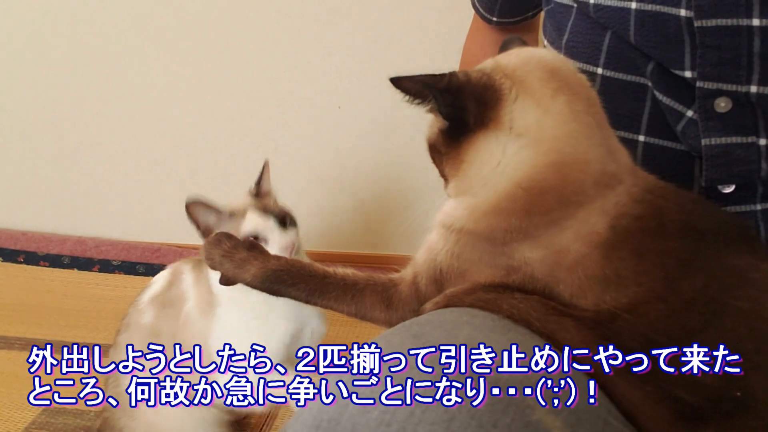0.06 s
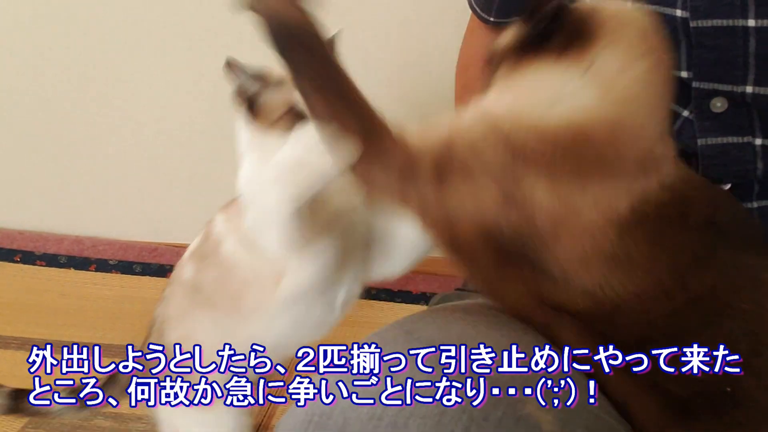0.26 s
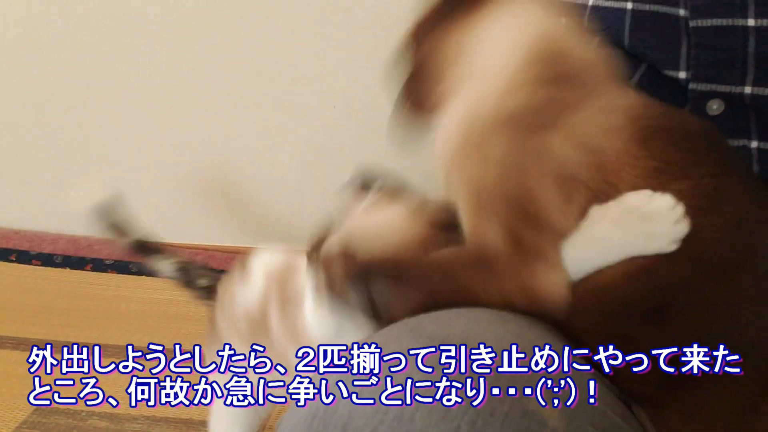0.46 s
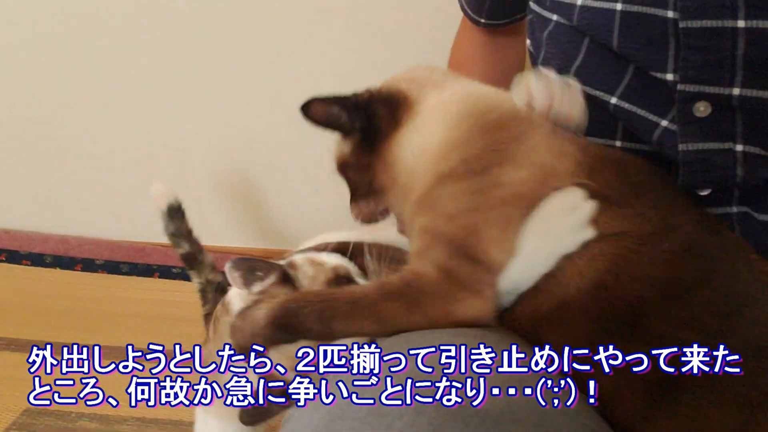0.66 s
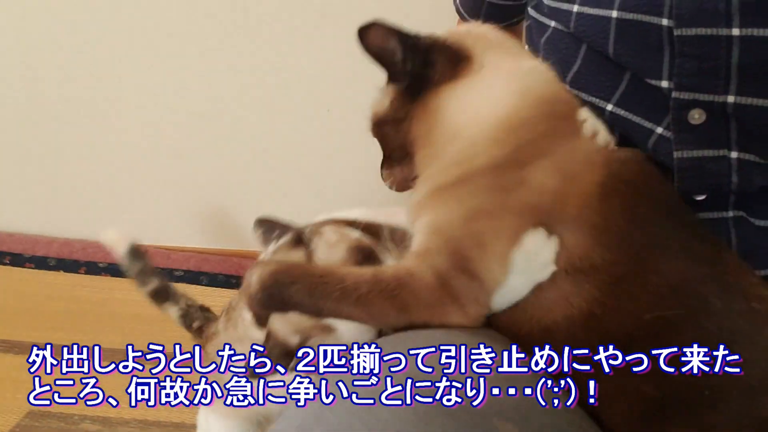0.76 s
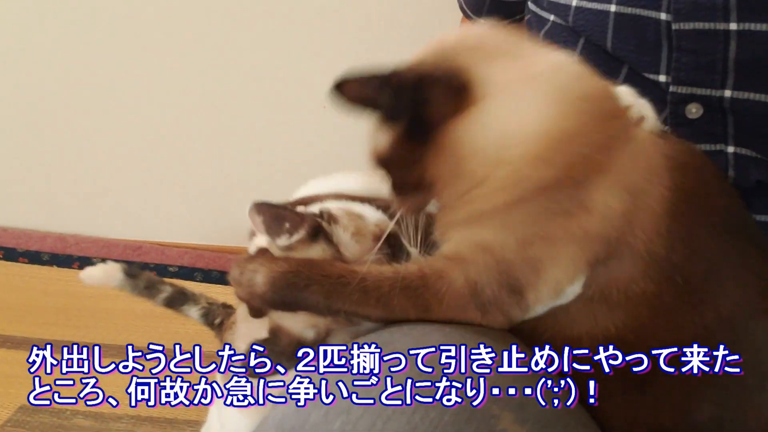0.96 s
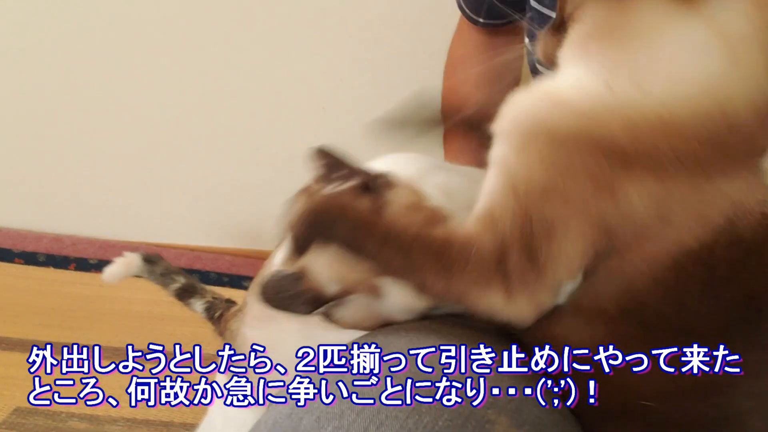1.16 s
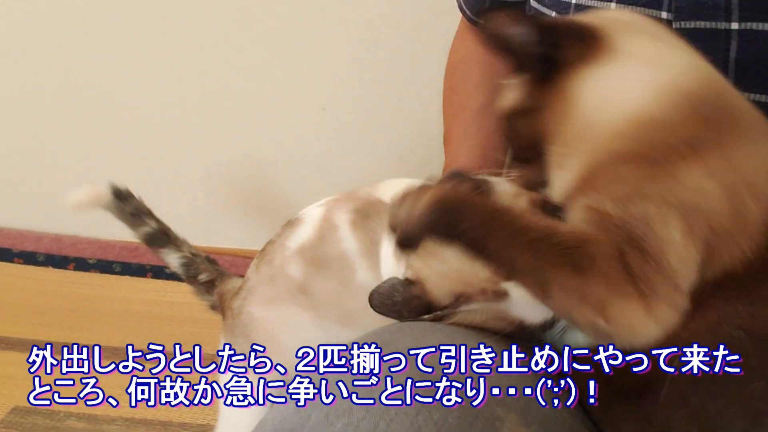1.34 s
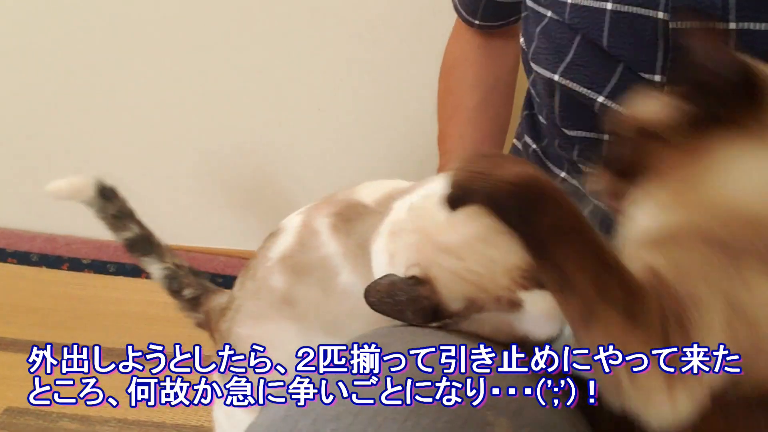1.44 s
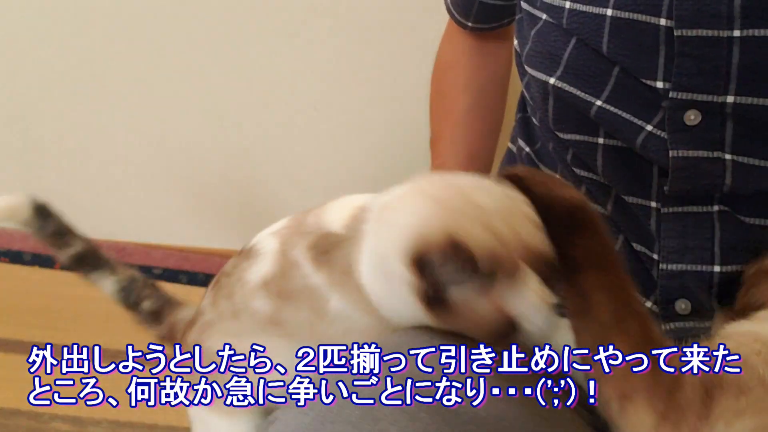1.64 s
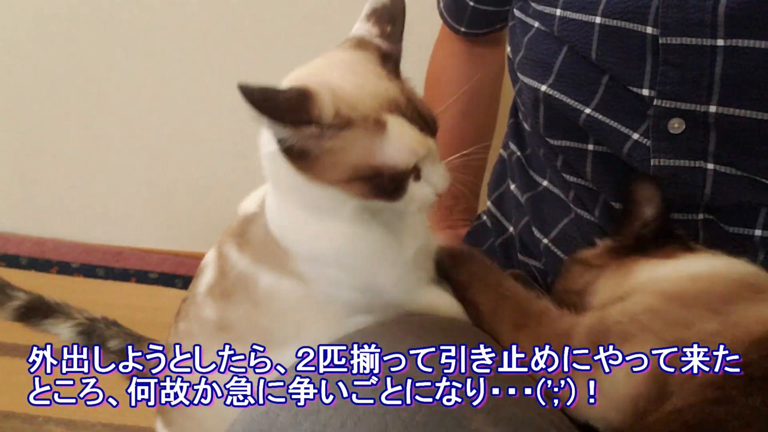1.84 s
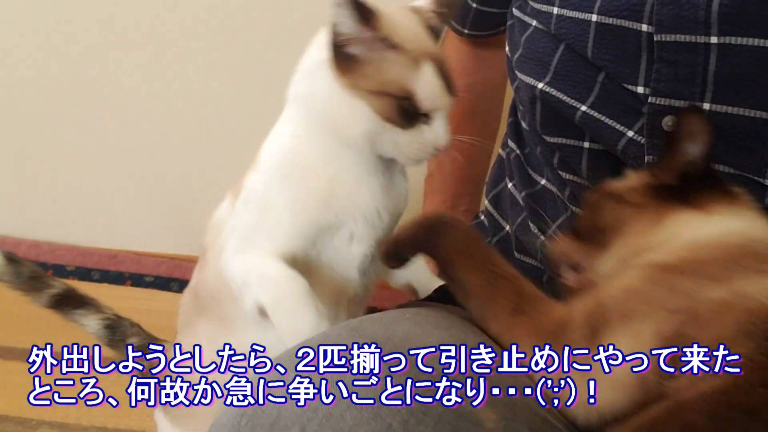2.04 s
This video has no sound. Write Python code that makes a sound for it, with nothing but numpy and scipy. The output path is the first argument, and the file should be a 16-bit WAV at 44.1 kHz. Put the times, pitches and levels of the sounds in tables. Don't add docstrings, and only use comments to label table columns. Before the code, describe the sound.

Two cats scuffle on a lap, claws snagging and ticking in cloth with soft body thuds.

```python
import sys
import numpy as np
from scipy import signal
from scipy.fft import rfft, irfft
from scipy.io import wavfile
from scipy.ndimage import uniform_filter1d

SR = 44100
rng = np.random.default_rng(int(sys.argv[2]) if len(sys.argv) > 2 else 0)


def waveform_to_disk(signal):
    frames = np.transpose(np.atleast_2d(signal))
    scaled = np.clip(frames, -1, 1) * 32767
    samples = np.round(scaled).astype(np.int16)
    wavfile.write(sys.argv[1], SR, samples)


def voltage_ratio(level):
    return 10 ** (np.asarray(level, float) / 20)


N = 92610


def evened(x):
    return x / np.sqrt(np.mean(x ** 2) + 1e-20)


def read(points, hz):
    f, value = np.transpose(points)
    return np.interp(np.log(hz + 1), np.log(f + 1), value)


def add(mix, start_s, sound):
    part = mix[:, round(start_s * SR):][:, :sound.shape[1]]
    part += sound[:, :part.shape[1]]


def coloured(x, spectrum, patchy_db):
    hz, _, z = signal.stft(x, SR, nperseg=256)
    patches = rng.standard_normal(z.shape[1:])
    patches = uniform_filter1d(patches, size=5, axis=0)
    patches = evened(uniform_filter1d(patches, size=8, axis=1))
    shaped = z * voltage_ratio(read(spectrum, hz)[:, None] + patchy_db * patches)
    return evened(signal.istft(shaped, SR, nperseg=256)[1][:, :N])


def strokes(rows):
    t = np.arange(N) / SR
    power = 0
    for peak_s, rise_s, fall_s, level_db in rows:
        side_s = np.where(t < peak_s, rise_s, fall_s)
        power = power + voltage_ratio(2 * level_db) * np.exp(-2 * ((t - peak_s) / side_s) ** 2)
    return np.sqrt(power)


def crackle(per_s, spread_db, slip_s, share):
    jumps_db = spread_db * np.minimum(rng.exponential(1, N), 2.1)
    slips = (rng.random(N) < per_s / SR) * voltage_ratio(jumps_db)
    slips = signal.lfilter([1], [1, -np.exp(-1 / (slip_s * SR))], slips)
    return rng.standard_normal((2, N)) * (1 + share * evened(slips))


def ring(hz, t60_s, phase, count):
    t = np.arange(count) / SR
    return voltage_ratio(-60 * t / t60_s) * np.sin(2 * np.pi * hz * t + np.reshape(phase, (2, 1)))


def hiss():
    # pitch_hz, level_db (per Hz)
    hiss_spectrum = [(75, -1.5), (140, -17), (1450, -18), (2000, -29.5), (5600, -36), (7200, -24),
                     (8600, -37.5), (16000, -35)]
    return voltage_ratio(-53.5) * coloured(rng.standard_normal((2, N)), hiss_spectrum, patchy_db=0.85)


def rumble():
    # time_s, level_db
    swell = [(0, -51.5), (.3, -55.5), (.45, -55.5), (.8, -44), (1.15, -47), (1.4, -52.5), (1.7, -60),
             (2.1, -52.5)]
    centre_hz, width_hz = 41.7, 10.8
    hz = np.fft.rfftfreq(N, 1 / SR)
    band = 1 + ((hz - centre_hz) / width_hz * 2) ** 4
    a, b = evened(irfft(rfft(rng.standard_normal((2, N))) / band, N))
    pair = np.array([a, voltage_ratio(-14.0) * (0.61 * a + 4.1 * b)])
    return voltage_ratio(np.interp(np.arange(N) / SR, *np.transpose(swell))) * pair


def room(x):
    t60_s, level_db = .14, -17
    hz, t, z = signal.stft(rng.standard_normal((2, 12000)), SR, nperseg=128)
    decay_s = t60_s * (1 + hz[:, None] / 4000) ** -.4
    tail = signal.istft(z * voltage_ratio(-60 * t / decay_s), SR, nperseg=128)[1]
    tail[:, :130] = 0
    return voltage_ratio(level_db) * signal.fftconvolve(x[:1], tail / np.linalg.norm(tail[0]), axes=1)[:, :N]


def ports(pair):
    # pitch_hz, correlation (-1 to 1)
    likeness = [(60, 0.82), (180, -0.46), (550, -0.76), (1650, -0.92), (5000, -1.0015), (15000, -0.93)]
    # pitch_hz, level_db
    balance = [(60, 3.5), (380, 3.5), (2380, 2), (15000, 4.5)]
    hz = np.fft.rfftfreq(N, 1 / SR)
    a, b = rfft(pair)
    same = np.clip(read(likeness, hz), -1, 1)
    tilt = voltage_ratio(read(balance, hz) / 2)
    return irfft([a * tilt, (same * a + np.sqrt(1 - same ** 2) * b) / tilt], N)


def thuds():
    # start_s, level_db (peak), pitch_hz, t60_s
    knocks = [(.375, -39, 75.5, 0.4), (0.378, -27.5, 227, 0.021), (0.484, -33, 98.3, 0.27),
              (.517, -28, 727, 0.11), (0.525, -38, 74.6, 0.2), (0.59, -37.5, 108.5, 0.18),
              (.593, -25, 285, 0.024), (0.692, -39, 128.5, 0.085), (1.445, -26.5, 451, 0.06),
              (1.454, -21, 420, 0.07), (1.452, -39, 101.5, 0.18), (1.468, -29, 330, 0.029),
              (1.518, -19.5, 225, 0.033), (1.545, -30.5, 228, 0.026), (1.561, -39, 80, 0.17),
              (1.764, -23.5, 332, 0.022)]
    port_lag_s, right_db = 0.0014, -7
    out = np.zeros((2, N))
    for (start_s, level_db, hz, t60_s), phase in zip(knocks, rng.uniform(0, 2 * np.pi, (len(knocks), 2))):
        rise = np.minimum(np.arange(8000) / SR * hz / 0.18, 1)
        lag = min(2 * np.pi * hz * port_lag_s, np.pi)
        main = ring(hz, t60_s, [0, -lag], count=8000)
        neighbour = ring(hz * 1.37, t60_s * 2.04, phase, count=8000)
        add(out, start_s, voltage_ratio(level_db) * rise * (main + 0.17 * neighbour))
    return out * voltage_ratio(np.array([[0], [right_db]]))


def fur():
    # peak_s, rise_s, fall_s, level_db
    swishes = [(.125, 0.012, 0.041, -64), (.34, 0.0028, 0.11, -49), (.43, 0.024, 0.073, -48.5),
               (.519, 0.0033, 0.012, -28.5), (.64, 0.059, 0.079, -42.5), (.8, 0.075, 0.11, -50),
               (.87, 0.076, 0.037, -51), (1.0, 0.15, 0.08, -56.5), (1.17, 0.04, 0.045, -73),
               (1.26, 0.071, 0.073, -46.5), (1.38, 0.014, 0.05, -53.5), (1.45, 0.0029, 0.017, -39.5),
               (1.55, 0.036, 0.11, -45.5), (1.69, 0.02, 0.033, -45), (1.768, 0.0037, 0.007, -34.5),
               (1.81, 0.065, 0.092, -48), (1.91, 0.11, 0.086, -47.5), (2.09, 0.052, 0.087, -55.5),
               (1.125, .02, 0.02, -56), (.365, .006, .03, -49), (.48, 0.027, .015, -41),
               (.555, 0.007, 0.049, -44), (1.485, 0.016, 0.04, -44.5)]
    # pitch_hz, level_db (per Hz)
    fur_spectrum = [(1500, -75), (3000, -16), (5000, 5), (7500, 5), (10000, 4.5), (12300, 7), (13600, -4.5),
                    (16000, 6.5)]
    # pitch_hz, width_hz, level_db
    hair_lines = [(5200, 1000, -8), (10900, 300, -7), (12400, 600, -7)]
    # peak_s, rise_s, fall_s, level_db
    whistle = (0.7, 0.04, -0.01, -40.5)
    rub = crackle(per_s=1500., spread_db=2., slip_s=.0008, share=.3)
    hz = np.fft.rfftfreq(N, 1 / SR)
    sing = 0
    for pitch_hz, width_hz, level_db in hair_lines:
        line = rfft(rub) / (1 + ((hz - pitch_hz) / width_hz * 2) ** 2)
        sing = sing + voltage_ratio(level_db) * evened(irfft(line, N))
    return strokes(swishes) * coloured(rub, fur_spectrum, patchy_db=1.5) + strokes([whistle]) * sing


def cloth():
    # peak_s, rise_s, fall_s, level_db
    drags = [(.13, 0.04, 0.041, -56.5), (.25, 0.066, 0.13, -58.5), (.375, 0.039, 0.1, -38),
             (.488, 0.014, 0.03, -36), (.52, 0.0059, 0.029, -34), (.57, 0.049, 0.089, -43),
             (.66, 0.099, 0.14, -47.5), (.79, 0.063, 0.059, -48), (1.0, 0.024, 0.026, -57.5),
             (1.11, 0.03, 0.14, -48), (1.18, 0.078, 0.092, -55), (1.26, 0.041, 0.033, -42),
             (1.37, 0.064, 0.07, -45.5), (1.455, 0.0076, 0.016, -29.5), (1.52, 0.051, 0.021, -40.5),
             (1.59, 0.041, 0.013, -37.5), (1.65, 0.056, 0.041, -43.5), (1.69, 0.027, 0.038, -43),
             (1.775, 0.011, 0.014, -40.5), (1.87, 0.18, 0.041, -49)]
    # pitch_hz, level_db (per Hz)
    cloth_spectrum = [(70, -44), (130, 3.5), (500, 5.5), (1400, 5.5), (2200, -2), (4000, 5), (8000, -12.5),
                      (16000, -42.5)]
    rub = crackle(per_s=1100., spread_db=4., slip_s=0.0007, share=0.6)
    return strokes(drags) * coloured(rub, cloth_spectrum, patchy_db=1.5)


def scrape():
    # peak_s, rise_s, fall_s, level_db
    rake = (.792, .035, .03, -45)
    pitch_hz, climb_hz_per_s, width_hz = 2700, 30000, 2000
    hz = np.clip(pitch_hz + climb_hz_per_s * (np.arange(N) / SR - rake[0]), 900, 4000)
    turn = np.exp(2j * np.pi * np.cumsum(hz) / SR)
    r = np.exp(-np.pi * width_hz / SR)
    low = crackle(per_s=450., spread_db=4., slip_s=.0009, share=1.2) / turn
    for _ in range(2):
        low = signal.lfilter([1 - r], [1, -r], low)
    return strokes([rake]) * evened((turn * low).real)


def snags():
    # start_s, level_db (peak), pitch_hz
    first_tussle = [(.1188, -36, 6500), (.3354, -17, 7200), (.3602, -21, 6800), (.381, -23, 900),
                    (.4858, -21, 1900), (.4905, -22, 1900), (.4925, -26, 2300), (.4985, -25, 1800),
                    (.5025, -29, 1500), (.5096, -21, 1900), (.5173, -11, 2000), (.5197, -15, 2600),
                    (.5212, -14, 2350), (.5244, -12, 2400), (.5278, -16, 2000), (.5352, -14, 1900),
                    (.5369, -14, 2300), (.5398, -20, 2000), (.5931, -19, 2200), (.5932, -30, 12500),
                    (.7682, -29, 1900), (.7835, -27, 1900), (.7886, -27, 3030), (.7935, -26, 2820),
                    (.7973, -24, 3050), (.8399, -33, 1900), (.993, -34, 2100)]
    # start_s, level_db (peak), pitch_hz
    second_tussle = [(1.0873, -30, 4340), (1.1015, -26, 2950), (1.104, -30, 2270), (1.1111, -11, 3410),
                     (1.1335, -25, 3100), (1.1653, -5.5, 3600), (1.2072, -28, 2410), (1.2406, -27, 2000),
                     (1.2561, -20, 3000), (1.2717, -28, 8000), (1.3672, -24, 2610), (1.3887, -32, 1450),
                     (1.4472, -15, 2380), (1.453, -9, 5800), (1.4539, -10, 2600), (1.4566, -16, 2900),
                     (1.4604, -18, 1850), (1.5183, -14, 1500), (1.6344, -29, 1600), (1.6391, -15, 1600),
                     (1.7691, -27, 8900), (1.7799, -23, 6970), (1.8324, -23, 6740)]
    # start_s, level_db (peak), pitch_hz
    further_snags = [(.1117, -44, 4400), (.1208, -40, 6400), (.3676, -27, 6000), (.4843, -24, 2200),
                     (.4745, -32, 1700), (.5176, -24, 13000), (.5203, -26, 12500), (.5404, -27, 13000),
                     (.7555, -33, 1800), (.9703, -40, 3600), (1.0831, -40, 3200), (1.2152, -31, 2900),
                     (1.2629, -30, 3900), (1.4474, -30, 12000), (1.5184, -21, 4300), (1.56, -30, 4400),
                     (1.6391, -20, 3200), (1.5961, -29, 5300), (1.7657, -30, 7400), (1.7801, -33, 11500),
                     (1.8146, -36, 8000), (2.0585, -42, 2900)]
    fray_s, fray_share, tick_db, trim_db = .0006, .33, -15, -.8
    base_q, narrow_hz = .75, 6500
    out, t = np.zeros((2, N)), np.arange(256) / SR
    rows = list(first_tussle) + list(second_tussle) + list(further_snags)
    for (start_s, level_db, hz), fray in zip(rows, rng.standard_normal((len(rows), 2, 256))):
        burst = fray_share * fray * t / fray_s * np.exp(-t / fray_s)
        burst[[0, 1], [18, 19]] -= 2.5
        band = signal.iirpeak(min(hz, 15000), base_q * (1 + (hz / narrow_hz) ** 2), SR)
        rung = signal.lfilter(*band, signal.lfilter(*band, burst))
        rung = rung / abs(rung).max(1, keepdims=True)
        tick = np.diff(burst, prepend=0) / abs(burst).max()
        rung = rung + voltage_ratio(tick_db) * min(hz, 5000) / 3500 * tick
        add(out, start_s - .0005, voltage_ratio(level_db + trim_db) * rung)
    return out


def scene():
    claws, blows = snags(), thuds()
    direct = cloth() + fur() + hiss() + claws + scrape()
    return ports(direct + room(claws + blows)) + blows + rumble()


def hush(x):
    # centre_s, half_length_s, level_db
    dips = [
        (.328, .004, -6),
        (.506, .006, -4),
        (1.097, .003, -7),
        (1.16, .0017, -25),
        (1.439, .003, -40),
    ]
    t = np.arange(N) / SR
    bass = signal.sosfiltfilt(signal.butter(2, 120, fs=SR, output="sos"), x)
    dip_db = sum(db * np.exp(-((t - centre_s) / half_s) ** 4) for centre_s, half_s, db in dips)
    return bass + (x - bass) * voltage_ratio(dip_db)


def top_cut(x):
    return signal.sosfilt(signal.butter(12, 16820, fs=SR, output="sos"), x)


def record(dry):
    # pitch_hz, level_db
    port_response = [(20, 0), (2200, -1), (3000, 3), (3850, -6), (5400, 3), (7600, 1), (8900, -4),
                     (11500, 1)]
    log_gain = np.log(voltage_ratio(read(port_response, abs(np.fft.fftfreq(1024, 1 / SR)))))
    port = np.fft.ifft(np.exp(log_gain - 1j * signal.hilbert(log_gain).imag)).real[:512]
    low_cut = signal.butter(5, 38, "high", fs=SR, output="sos")
    heard = signal.oaconvolve(signal.sosfilt(low_cut, hush(dry)), port[None])[:, :N]
    high_cut = signal.firwin(511, 15750, window=("kaiser", 7), fs=SR)
    return top_cut(signal.oaconvolve(heard, high_cut[None], "same"))


dry = scene()
out = record(dry)
waveform_to_disk(out)
```